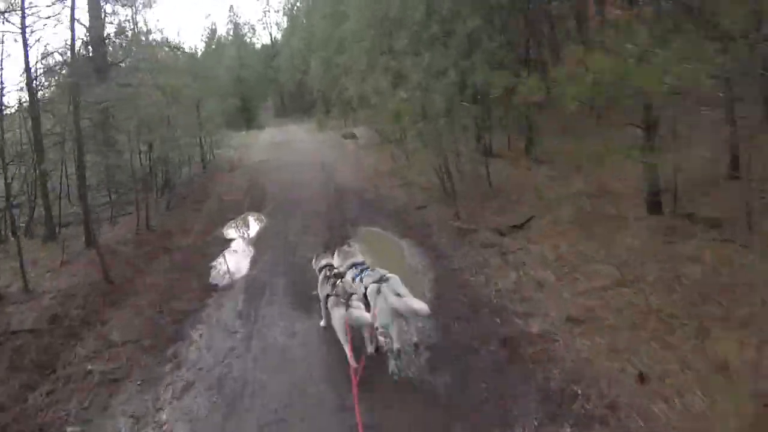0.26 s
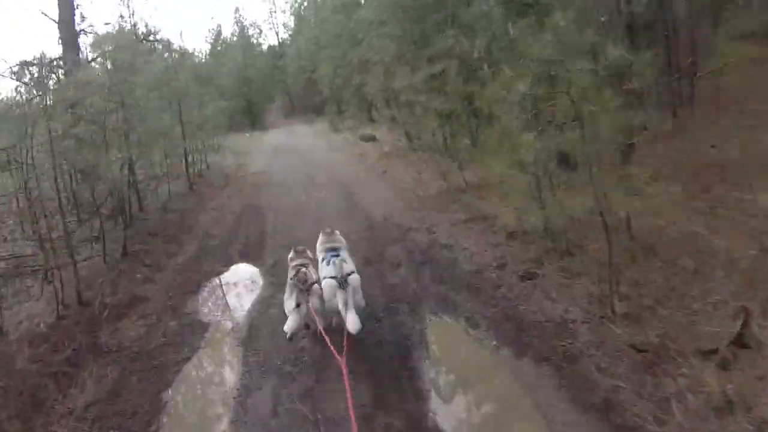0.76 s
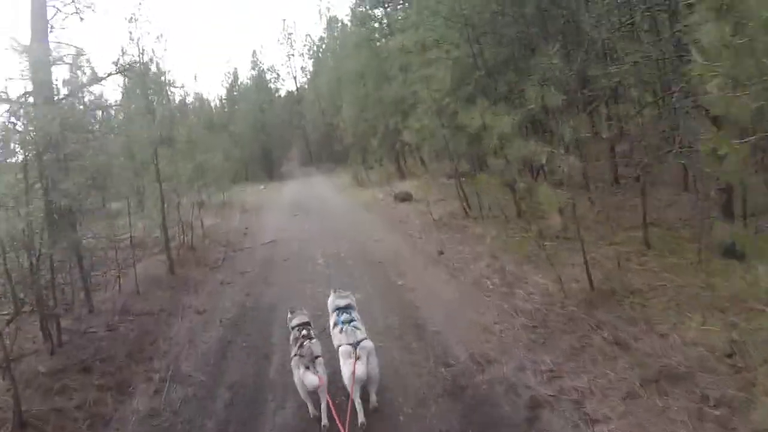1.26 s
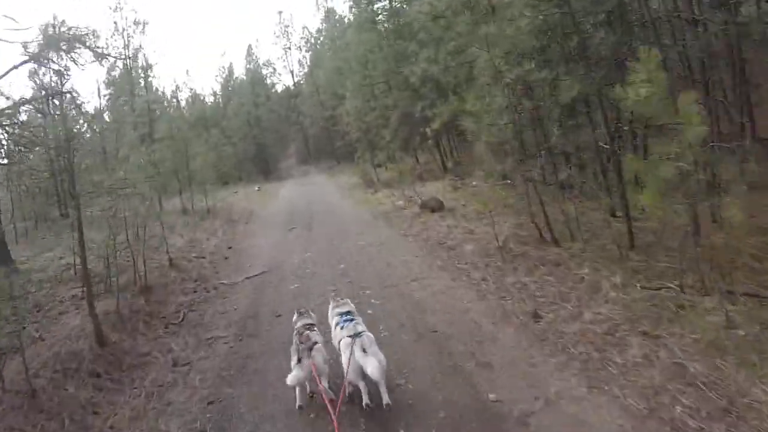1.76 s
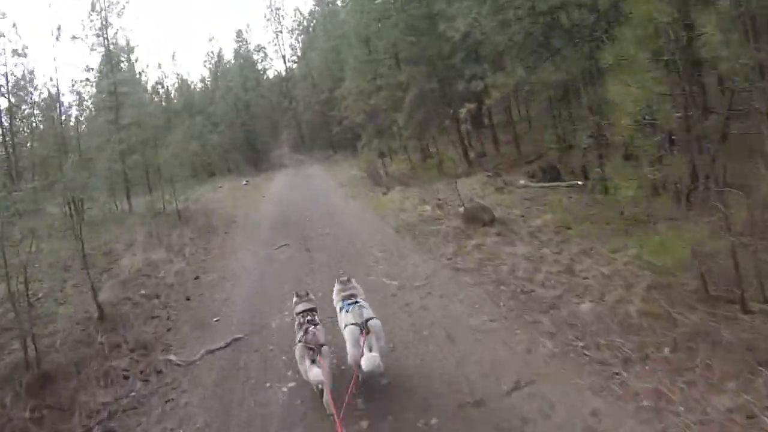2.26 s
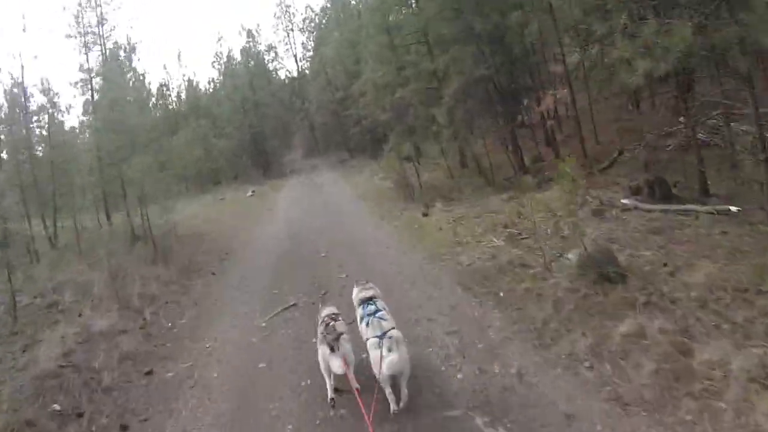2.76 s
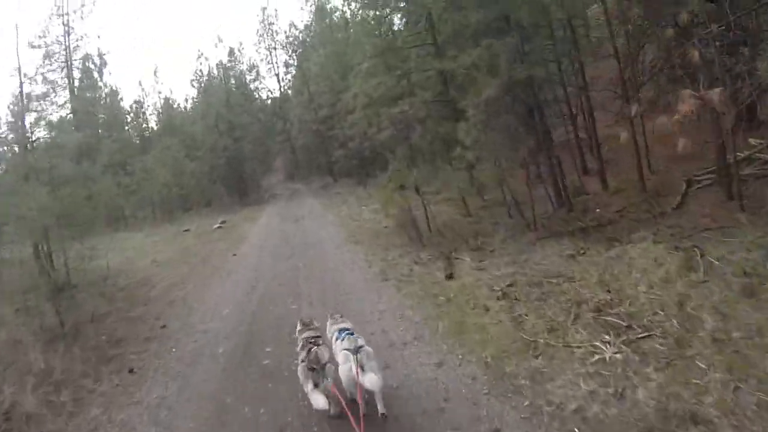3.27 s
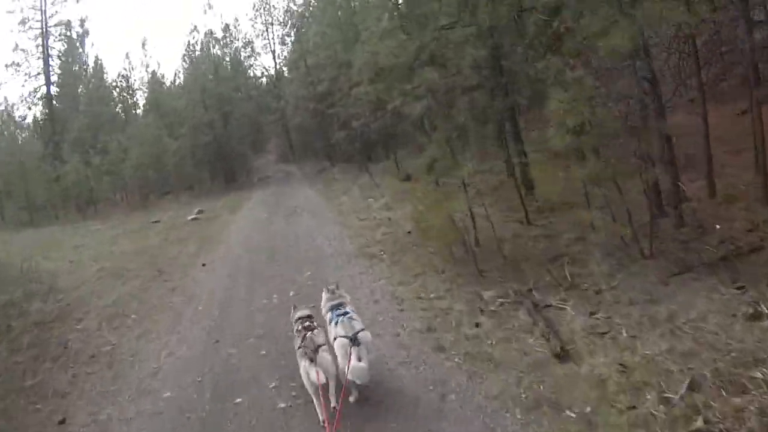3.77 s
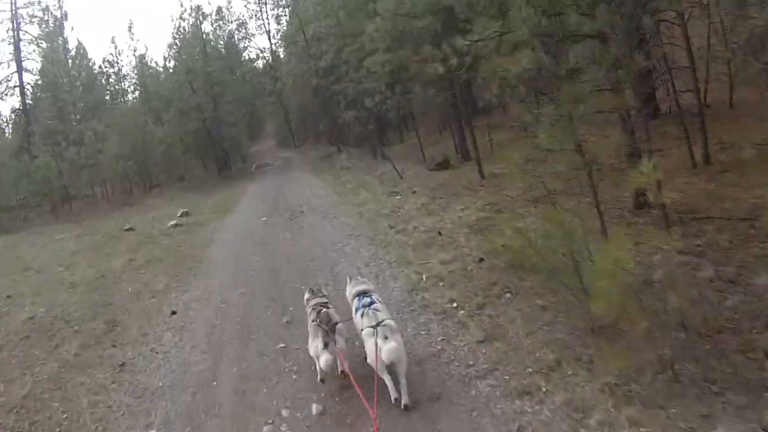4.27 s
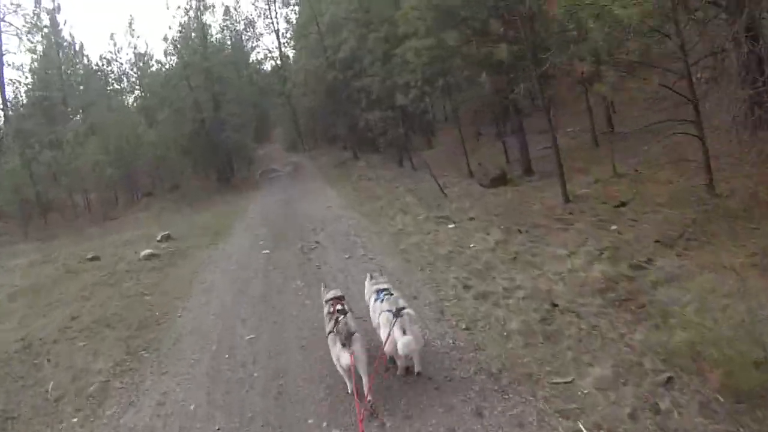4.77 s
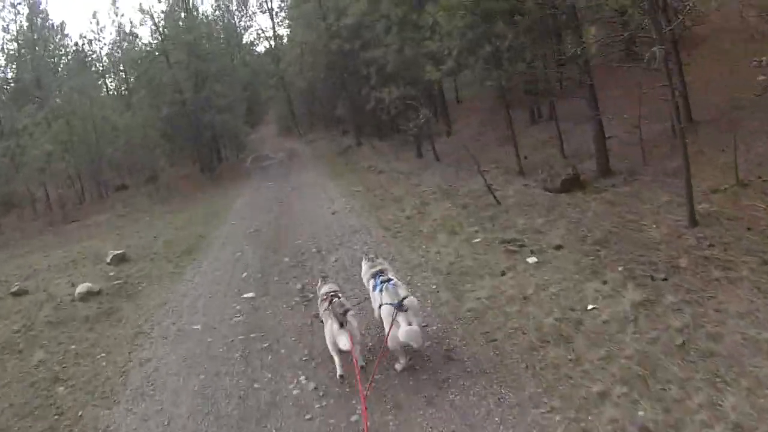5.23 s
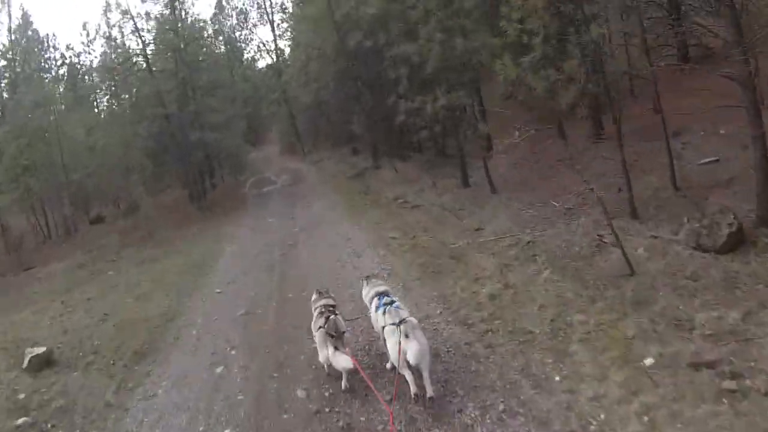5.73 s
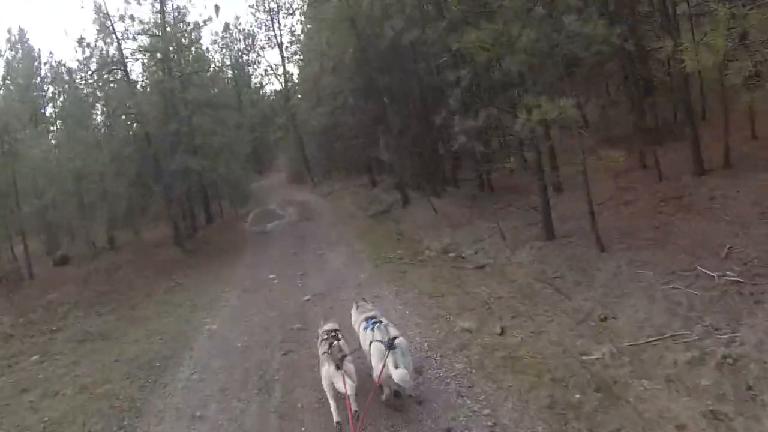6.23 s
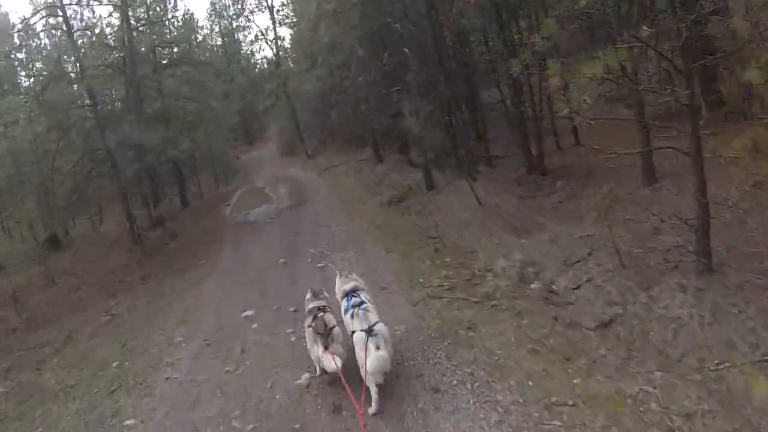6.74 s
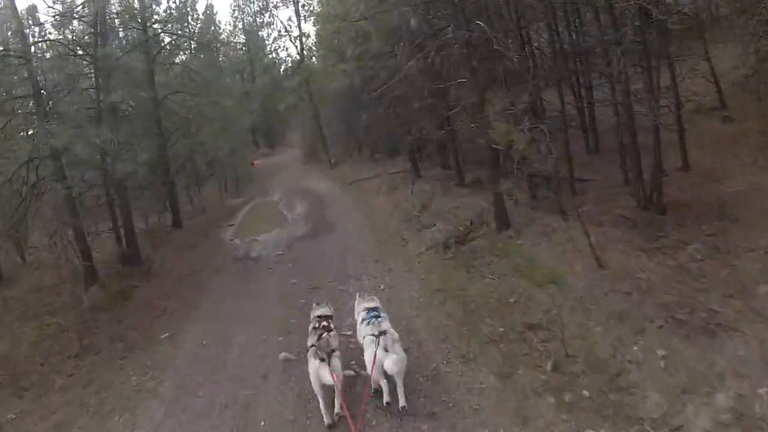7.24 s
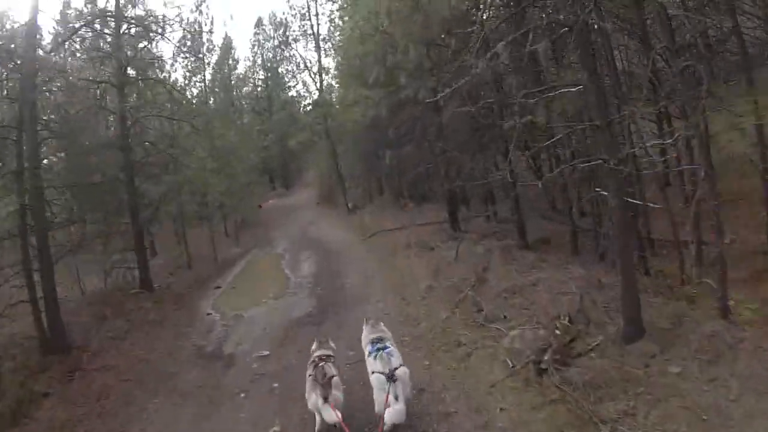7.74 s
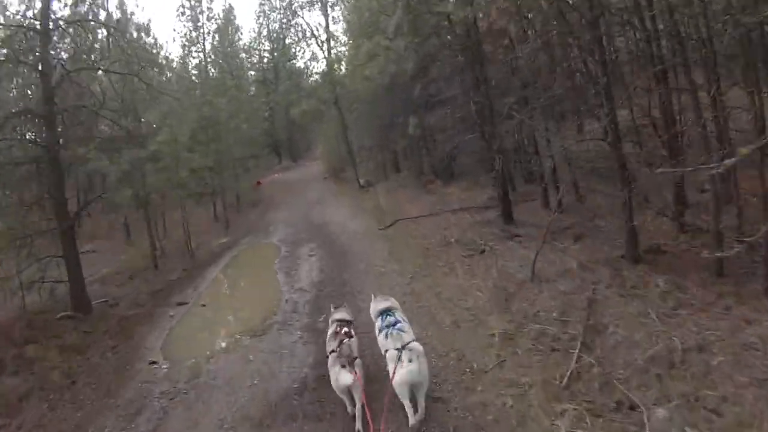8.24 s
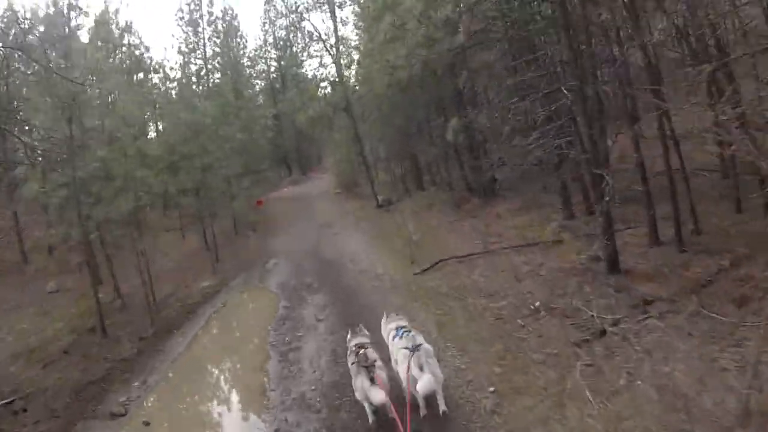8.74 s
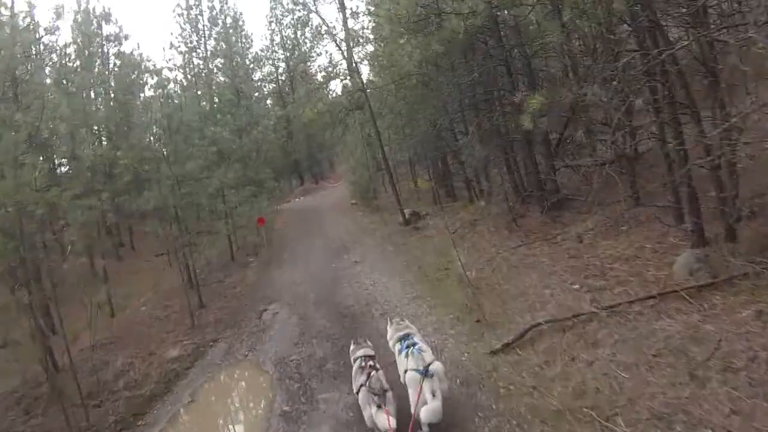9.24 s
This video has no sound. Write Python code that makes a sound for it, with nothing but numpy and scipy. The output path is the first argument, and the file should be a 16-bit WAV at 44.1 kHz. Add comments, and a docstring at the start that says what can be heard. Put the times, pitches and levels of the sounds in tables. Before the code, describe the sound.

A scooter pulled by two dogs rolls steadily through mud and gravel, with low wind roar, gritty crunching, stone snaps and light frame rattles.

```python
"""A muddy gravel trail in a forest: two dogs pull a kick scooter, heard through a closed case on the rider.
Wind on the case is drifting low noise; wet mud and sand are clicks and hiss shaped by filters.
The metal clips of the tow line clink faintly as fading tones, and bumps ring the frame's resonances.
The tyres drone and hum as low noise, crunch grit as crowds of clicks, and flick stones as short snaps."""
import sys
import numpy as np
from scipy import signal
from scipy.fft import rfft, irfft, next_fast_len
from scipy.io import wavfile
from scipy.ndimage import uniform_filter1d, map_coordinates

SR = 44100
rng = np.random.default_rng(int(sys.argv[2]) if len(sys.argv) > 2 else 0)


def file_out(sig):
    """Save sig as 16-bit WAV at sys.argv[1]."""
    # one column per channel
    cols = np.atleast_2d(sig).T
    # limit, then scale
    lim = np.clip(cols, -1, 1)
    pcm = np.round(lim * 32767).astype(np.int16)
    wavfile.write(sys.argv[1], SR, pcm)


N = 418950  # length in samples

# Levels in the tables are relative: the functions add their own gains, and the case colours the sum.
# How much loose gravel the tyres and paws crush: [t/s, level/dB]
GRAVEL_AMOUNT = [(0, -48), (.25, -47.5), (.6, -52.5), (1.55, -54.5), (2.1, -51.5), (2.45, -49.5),
                 (3.15, -50.5), (4, -45), (4.7, -48), (5.6, -48), (6.6, -49), (7.05, -47.5), (7.5, -51.5),
                 (7.95, -51.5), (8.75, -50.5), (9.5, -45.5)]
# Jolts of the frame: [t/s, strength/dB]
JOLTS = [(0.067, -19.5), (0.354, -24), (1.054, -18), (1.085, -24), (2.568, -16.5), (2.656, -20),
         (2.685, -19), (2.708, -29), (2.778, -24), (2.803, -23), (2.822, -17), (3.035, -21), (3.451, -24),
         (3.555, -25), (3.784, -24), (6.03, -21), (6.237, -30), (6.323, -23), (6.63, -24), (6.845, -23),
         (7.895, -27), (7.927, -24), (8.058, -23), (8.125, -26), (8.192, -25), (8.246, -20)]
# Colour of cracking grit: [f/Hz, level/dB]
GRIT_COLOUR = [(300, -43), (900, -3), (1600, 2), (2100, -2.5), (2800, -2), (3800, -10), (5200, -20),
               (7000, -32), (15000, -72)]
# Colour of flying sand and water: [f/Hz, level/dB]
SPRAY_COLOUR = [(800, -12.5), (2500, 0), (3800, 9), (5200, 4.5), (7000, -4.5), (8600, -5.5), (10000, -11.5),
                (12200, -12), (14000, -20), (15500, -40)]
USUAL_GRAVEL_DB, USUAL_RIDE_DB = -54.5, -37  # reference points for the gravel and the tyre drone


def amp(db):
    """Turn decibels into a gain."""
    return 10 ** (np.asarray(db) / 20)


def unit(x):
    """Scale to an average strength (rms) of 1."""
    return x / np.sqrt(np.mean(x ** 2) + 1e-20)


def curves(rows):
    """Draw straight lines between table rows: one curve for each column after the time."""
    s, *cols = np.transpose(rows)
    return [np.interp(np.arange(N) / SR, s, c) for c in cols]


def wobble(rate):
    """A smooth random curve through `rate` random points a second."""
    points = rng.standard_normal(2048)
    return map_coordinates(points, [np.arange(N) * rate / SR], mode="wrap")


def bell(s, half_s):
    """A smooth rise and fall around time s, as one value per sample."""
    return np.exp(-((np.arange(N) / SR - s) / half_s) ** 2)


def filtered(x, response):
    """Multiply the spectrum of x by a complex response to frequency."""
    size = 2 * next_fast_len((N + SR) // 2)
    hz = np.fft.rfftfreq(size, 1 / SR)
    return irfft(rfft(x, size) * response(hz), size)[:N]


def coloured(x, points):
    """Filter through [f/Hz, level/dB] points on a log axis, with no sound ahead of its cause."""
    def response(hz):
        f, db = np.transpose(points)
        gain = amp(np.interp(np.log(hz + 1), np.log(f), db))
        # folding the cepstrum gives the filter minimum phase
        cepstrum = irfft(np.log(gain))
        half = len(cepstrum) // 2
        return np.exp(rfft(np.r_[cepstrum[0], 2 * cepstrum[1:half]], len(cepstrum)))
    return filtered(x, response)


def rush(spectrum, patchy_db):
    """Noise of rms 1 whose colour drifts in random patches of time and frequency."""
    z = signal.stft(rng.standard_normal(N), nperseg=1024)[2]
    patches = uniform_filter1d(rng.standard_normal(z.shape), size=9, axis=0)
    patches = uniform_filter1d(patches, size=7, axis=1)
    noise = signal.istft(z * amp(patchy_db * unit(patches)))[1][:N]
    return unit(coloured(noise, spectrum))


def impacts(per_second, spread_db):
    """Clicks at random moments, with random signs and scattered sizes."""
    hit = rng.random(N) < per_second / SR
    size = amp(spread_db * np.minimum(rng.standard_normal(N), 2))
    return hit * size * rng.choice([-1, 1], N)


def add(track, s, sound):
    """Mix a sound into a track at time s."""
    part = track[max(round(s * SR), 0):][:len(sound)]
    part += sound[:len(part)]


def airflow():
    """Single eddies change the buffeting and the roar for a moment: (buffet dB, roar dB)."""
    # Strength of the air stream on the case: [t/s, roar level/dB]
    air = [(0, -30.5), (.25, -28.5), (.55, -31.5), (1.1, -35), (1.5, -29.5), (2.2, -28.5), (2.8, -28),
           (3.1, -28.5), (3.3, -25), (3.6, -26.5), (3.85, -30), (4.4, -29.5), (4.8, -30), (5.4, -32.5),
           (6.05, -30), (7.35, -35.5), (7.95, -33.5), (8.5, -33.5), (9.5, -37.5)]
    # Large eddies breaking on the case: [t/s, deep buffeting level/dB]
    turbulence = [(0, -32.5), (.35, -34), (1.1, -37.5), (1.6, -31.5), (2.1, -33), (2.8, -30), (3.2, -32),
                  (4.4, -35), (5.1, -32), (5.7, -32.5), (6.5, -34), (7.2, -37.5), (7.8, -32.5), (8.4, -37),
                  (8.85, -35), (9.2, -36.5), (9.5, -34)]
    # Single eddies: [t/s, change of buffeting/dB, change of roar/dB]
    gusts = [(2.94, 7.5, 1.5), (3.56, 3, 1), (4.04, 5, 6), (4.75, -2, 3), (5.63, 2.5, 0)]
    (roar_db,), (buffet_db,) = curves(air), curves(turbulence)
    buffet_db = buffet_db + 1.15 * wobble(12)
    for s, deep_db, lift_db in gusts:
        eddy = bell(s, half_s=0.037)
        buffet_db = buffet_db + deep_db * eddy
        roar_db = roar_db + lift_db * eddy
    return buffet_db, roar_db


def wind(buffet_db, roar_db):
    """Large eddies thump on the case; smaller ones roar as the speed rises."""
    # Colour of the roar: [f/Hz, level/dB]
    roar_colour = [(30, -18.5), (70, -6), (115, 1.5), (180, 2), (300, -2.5), (400, -7.5), (500, -13),
                   (900, -37), (2500, -47), (6000, -100)]
    # Colour of the deep buffeting: [f/Hz, level/dB]
    buffet_colour = [(8, -2.5), (25, -4), (55, -2), (90, -2), (150, -10), (400, -44.5), (2000, -77)]
    buffet = amp(buffet_db + 1.27) * rush(buffet_colour, patchy_db=-0.2)
    roar = amp(roar_db - 0.76 + 0.65 * wobble(16)) * rush(roar_colour, patchy_db=-0.46)
    return buffet + roar


def wet_sand(gravel_db, ride_db):
    """Level of the sand hiss (dB): it grows with the gravel, the tyre drone and the damp."""
    # Wetter ground near the puddles: [t/s, added sand hiss/dB]
    damp = [(0.98, 0), (1.05, 4.5), (1.28, 4.5), (1.4, 2.5), (4.5, -1), (7.6, -2), (8.8, 1.5), (9.5, 6)]
    damp_db, = curves(damp)
    with_gravel = 0.098 * (gravel_db - USUAL_GRAVEL_DB)
    with_ride = 0.69 * (ride_db - USUAL_RIDE_DB)
    return -63.5 + damp_db + with_gravel + with_ride


def spray(level_db):
    """Damp sand flies off the tyres in a faint, sparkling hiss: noise with clicks in it."""
    sparkle = unit(impacts(per_second=500, spread_db=6.5))
    sand = unit(rng.standard_normal(N) + 0.53 * sparkle)
    return amp(level_db + 3.5 + 1.4 * wobble(70)) * unit(coloured(sand, SPRAY_COLOUR))


def puddle(end_s, squelch_db, spray_db):
    """The tyres squeeze through mud and throw water, until they reach firm ground."""
    # Passing between the puddles: [t/s, mud squelch level/dB, water spray level/dB]
    passing = [(0, -54, -55), (.1, -49, -51.5), (.3, -47, -54.5), (.45, -52, -55), (.55, -68, -53.5),
               (.68, -59, -52.5), (.8, -73, -49), (.9, -72, -53), (1, -62, -52)]
    # Colour of squelching mud: [f/Hz, level/dB]
    mud_colour = [(900, -25), (1800, -12), (2500, -6), (3000, -4), (3800, -19), (5200, -18), (9000, -48)]
    mud_db, water_db = curves(passing)
    in_mud = np.clip((end_s - np.arange(N) / SR) / 0.03, 0, 1)
    bubbles = unit(coloured(impacts(per_second=1300, spread_db=6.0), mud_colour))
    water = unit(coloured(rng.standard_normal(N), SPRAY_COLOUR))
    return in_mud * (amp(mud_db + squelch_db) * bubbles + amp(water_db + spray_db) * water)


def ring(modes, t, blur):
    """Fading tones, a little different at every contact and blurred by chatter."""
    out = np.zeros(len(t))
    for hz, db, t60 in modes:  # t60: seconds to fade by 60 dB
        drift = blur * np.cumsum(rng.standard_normal(len(t)))
        phase = 2 * np.pi * (hz * rng.normal(1, 0.0043) * t + rng.random()) + drift
        out += amp(db + rng.normal(0, 1.3)) * 1000 ** (-t / t60) * np.sin(phase)
    return out * (1 - np.exp(-t / 0.0016))  # soft start


def clip_ring(centre_hz, t):
    """The cluster of close, high modes of one steel clip."""
    top_modes = [(-130, -3, 0.24), (0, -0.5, 0.12), (170, 0.5, .08)]
    modes = [(centre_hz + above_hz, db, t60) for above_hz, db, t60 in top_modes]
    return ring(modes, t, blur=0.066)


def clinks(top_db, lower_db, lower_t60):
    """Small steel clips swing against their rings; the notes depend on where they touch."""
    # Touches of the clips: [t/s, top ring f/Hz, top ring level/dB, lower ring f/Hz, lower ring level/dB]
    touches = [(0.078, 11900, -63, 8900, -61), (0.177, 11700, -62, 8800, -68),
               (0.427, 11700, -56, 7400, -67), (1.055, 11900, -71, 8870, -65),
               (1.765, 12300, -67, 8800, -72), (1.88, 11900, -72, 5800, -53),
               (2.222, 11780, -45, 7300, -58), (2.298, 11900, -65, 8800, -72),
               (2.53, 11900, -69, 8750, -66), (2.61, 11900, -72, 8750, -65), (2.789, 11900, -69, 8700, -60),
               (2.893, 11900, -70, 8900, -62), (2.913, 11950, -59, 8790, -63),
               (2.934, 11650, -60, 8900, -60), (3.537, 11700, -68, 8700, -59),
               (3.578, 11900, -74, 8800, -66), (3.635, 11900, -55, 8650, -66),
               (3.665, 11700, -55, 8530, -66), (3.949, 11700, -67, 8700, -74),
               (3.992, 11900, -66, 8350, -75), (4.349, 11950, -60.5, 8350, -71),
               (5.2, 11800, -70, 8700, -66), (5.38, 11900, -60, 8440, -62), (6.047, 11900, -74, 8800, -61),
               (6.255, 11950, -61, 6200, -57), (6.29, 11700, -64, 7410, -61),
               (6.378, 12000, -65, 8800, -72), (6.41, 11900, -75, 8800, -70), (6.49, 11900, -76, 9000, -66),
               (6.695, 11900, -76, 9000, -65), (6.729, 11900, -67, 6300, -66),
               (7.069, 11900, -65, 8300, -66), (7.42, 11900, -70, 8800, -67),
               (8.115, 12050, -63, 8500, -63), (8.481, 11700, -62, 6030, -52.5),
               (8.821, 11850, -58, 8440, -61), (9.183, 12350, -65, 5940, -62)]
    free_ring_db, damping_per_db = -57, 2.2  # a top ring below this level fades faster, per s for each dB
    out, t = np.zeros(N), np.arange(SR // 4) / SR
    for s, hz, db, low_hz, low_db in touches:
        damping = np.exp(-t * damping_per_db * max(free_ring_db - db, 0))
        add(out, s, amp(db + top_db) * damping * clip_ring(hz, t))
        add(out, s, amp(low_db + lower_db) * ring([(low_hz, 0, lower_t60)], t, blur=0.15))
    return out


def ticks(t60, gain_db):
    """Each hard strike of a clip on metal starts with a very short, bright burst of noise."""
    # Strikes: [t/s, strength/dB]
    strikes = [(2.2209, -56), (2.8489, -60), (3.6345, -62), (5.1387, -69), (6.4668, -60), (8.359, -59),
               (8.821, -60)]
    out, t = np.zeros(N), np.arange(SR // 40) / SR
    for s, db in strikes:
        add(out, s, amp(db + gain_db) * 1000 ** (-t / t60) * rng.standard_normal(len(t)))
    return coloured(out, [(2000, -25), (5000, 13), (9000, 9.0), (15000, -9)])


def chatter(ride_db, hz, t60):
    """Vibration keeps a loose steel part tinkling, more on rough ground and after each jolt."""
    # Spells of extra tinkling: [t of the middle/s, half length/s, level/dB]
    spells = [(3.57, .04, -75), (6.23, .05, -76), (6.5, .1, -75)]
    t = np.arange(SR // 8) / SR
    note = ring([(hz, 0, t60)], t, blur=0.2)
    tinkle = signal.fftconvolve(impacts(per_second=40, spread_db=-1.5), note)[:N]
    shaking = amp(-87 + 1.6 * (ride_db - USUAL_RIDE_DB))
    settle = 1000 ** (-np.arange(SR) / SR / 0.76)  # fades by 60 dB in 0.76 s
    for s, db in JOLTS:
        add(shaking, s, amp(db - 66) * settle)
    for s, half_s, db in spells:
        shaking = shaking + amp(db) * bell(s, half_s)
    return shaking * unit(tinkle)


def jingle(t60):
    """The running dogs make the small links of the line touch, each with its own short note."""
    per_second, level_db, scatter_db = 6, -73, 2
    pitch_hz, scatter_octaves = 11900, 0.022
    out, t = np.zeros(N), np.arange(SR // 16) / SR
    draws = rng.random((80, 3))
    times = np.cumsum(-np.log(1 - draws[:, 0])) / per_second  # random gaps
    scatter = np.sqrt(12) * (draws[:, 1:] - .5)  # even spread, standard deviation 1
    for s, (size, pitch) in zip(times, scatter):
        hz = pitch_hz * 2 ** (scatter_octaves * pitch)
        add(out, s, ring([(hz, level_db + scatter_db * size, t60)], t, blur=0.1))
    return out


def frame_ring(x):
    """The frame and deck answer a push with their resonances."""
    # Resonances: [f/Hz, width/Hz, level/dB]
    resonances = [(380, 68, -16), (653, 446, 7.5), (943, 484, 4), (1097, 47, -0.5)]

    def response(f):
        total = 0
        for k, (centre, width, db) in enumerate(resonances):
            band = 1j * f * width
            # neighbouring resonances push in opposite directions
            total = total + (-1) ** k * amp(db) * band / (centre * centre - f * f + band)
        return total
    return filtered(x, response)


def bumps(rise_s, t60, gain_db, push_db):
    """A jolt, softened by the tyre, knocks the frame and rattles it for a moment."""
    out, t = np.zeros(N), np.arange(SR // 4) / SR
    shape = (1 - np.exp(-t / rise_s)) * 1000 ** (-t / t60)
    for s, db in JOLTS:
        add(out, s, amp(db + gain_db) * shape * rng.standard_normal(len(t)))  # rattle
        add(out, s + 0.001, amp([db + push_db]))  # one sharp push
    return frame_ring(coloured(out, [(500, 1.0), (1200, 2.5), (3000, -4.0), (10000, -33)]))


def drone(level_db):
    """The tyres roll on packed earth and shake the frame: a low, unsteady noise."""
    # Colour of the drone: [f/Hz, level/dB]
    drone_colour = [(80, -9), (250, 3.5), (380, 7), (460, 2), (550, 0), (630, 2.5), (720, 0), (830, -1),
                    (1020, -4.5), (1250, -13), (2000, -23), (5000, -64.5)]
    return amp(level_db + 2.5 + 0.64 * wobble(40)) * rush(drone_colour, patchy_db=1.02)


def hum():
    """The tread blocks patter on packed earth and merge into a hollow hum, made of narrow noise."""
    # Firm, packed stretches: [t/s, level/dB]
    firm = [(4.8, -60), (5.45, -38.5), (6.0, -44.5), (6.6, -37.5), (7.0, -36.5), (7.4, -50), (8.3, -43.5),
            (8.9, -60)]
    # Colour of the tread's hum: [f/Hz, level/dB]
    tread_colour = [(150, -30), (240, 1), (300, -2.5), (370, 1.5), (420, -9.5), (520, -27.5), (2000, -100)]
    level_db, = curves(firm)
    return amp(level_db) * rush(tread_colour, patchy_db=2.5)


def grind():
    """Coarse stones knock against each other under the tyres, lower in pitch than the grit."""
    # Patch of coarse stones: [t/s, level/dB]
    coarse = [(7.5, -80), (7.76, -50.5), (7.92, -48), (8.0, -49), (8.12, -47), (8.2, -52), (8.255, -43),
              (8.32, -51.5), (8.55, -51.5), (8.8, -80)]
    # Colour of the grinding: [f/Hz, level/dB]
    grind_colour = [(400, -27), (900, -6), (1400, -3), (2000, -0.5), (2500, -8), (3300, -26), (6000, -57)]
    level_db, = curves(coarse)
    return amp(level_db) * unit(coloured(impacts(per_second=450, spread_db=2), grind_colour))


def crushing(gravel_db):
    """The crunch follows the patchy gravel and flares where a paw or tyre kicks up grit (dB)."""
    # Short spatters of grit: [t/s, lift of the crunch/dB]
    scuffs = [(1.255, 8), (1.285, 9), (1.71, 8.5), (2.812, 8.5), (3.785, 6.5), (6.35, 5.5), (6.97, 5),
              (7.07, 4), (7.185, 4), (7.38, 3.5)]
    level_db = gravel_db + 0.5 * wobble(13)
    for s, lift_db in scuffs:
        level_db = level_db + lift_db * bell(s, half_s=0.012)
    return level_db


def crunch(level_db, grain_db, bed_db):
    """Grains crack under the tread in short clumps, over a bed of finer grit."""
    clumps = amp(2.9 * wobble(90) + 2.36 * wobble(35))
    cracks = coloured(impacts(per_second=600, spread_db=-0.5), GRIT_COLOUR)
    grains = amp(grain_db) * unit(clumps * cracks)
    bed = amp(bed_db) * rush(GRIT_COLOUR, patchy_db=2.0)
    return amp(level_db) * (grains + bed)


def pebbles():
    """Small stones at random moments, stronger in deep gravel: rows like those of the larger stones."""
    per_second, over_gravel_db, scatter_db = 30, 15, 1
    pitch_hz, scatter_octaves, fall_cycles = 1940, 0.53, 0.43
    draws = rng.random((600, 3))
    s = np.cumsum(-np.log(1 - draws[:, 0])) / per_second  # random gaps
    size, pitch = np.sqrt(12) * (draws[:, 1:].T - .5)  # even spread, standard deviation 1
    depth_db = np.interp(s, *np.transpose(GRAVEL_AMOUNT)) - USUAL_GRAVEL_DB
    db = USUAL_GRAVEL_DB + over_gravel_db + 0.49 * depth_db + scatter_db * size
    hz = pitch_hz * 2 ** (scatter_octaves * pitch)
    rows = np.c_[s, db, hz, np.full(len(s), fall_cycles)]
    return list(rows[s < N / SR])


def stones(rise_cycles, gain_db):
    """A pinched stone shoots out with a dry snap of a cycle or two; a few ring on a little longer."""
    # Larger stones flicked by the tyres: [t/s, strength/dB, pitch f/Hz, fading time/cycles]
    large_stones = [(0.107, -22, 1790, .5), (0.165, -19.5, 2420, 0.44), (0.377, -26, 2500, 0.46),
                    (0.456, -25, 2400, .6), (0.83, -24, 1860, 0.27), (0.9975, -27.5, 2930, .3),
                    (1.1288, -24, 1930, 0.17), (1.2495, -31, 2600, .5), (1.338, -36, 2600, .8),
                    (1.4088, -29, 2280, 0.49), (1.4588, -28.5, 1900, 0.33), (1.482, -35, 2200, .5),
                    (1.8491, -24, 2330, 1.2), (1.8494, -31, 3850, 2.4), (1.858, -37, 3750, 3.6),
                    (1.9299, -26, 2900, .3), (2.4503, -23.5, 2300, .5), (2.4542, -17.5, 1700, .25),
                    (2.6918, -17, 1680, 1.7), (2.6922, -28.5, 2630, 2.6), (2.7658, -24, 2500, 0.92),
                    (2.906, -32, 2600, .6), (3.7507, -25, 2230, 0.27), (3.783, -32, 1570, .3),
                    (3.8615, -23.5, 2100, .5), (3.9715, -20, 1640, 0.27), (3.9925, -23.5, 1770, .4),
                    (4.0624, -23, 1970, .4), (4.1132, -22.5, 2150, 0.35), (4.283, -26, 1800, .5),
                    (4.411, -24, 2100, .4), (4.4173, -16.5, 2160, 0.41), (4.4654, -22.5, 1820, .4),
                    (4.522, -28, 2300, 0.43), (4.547, -29, 1900, .4), (4.694, -22.5, 2300, 0.36),
                    (4.7145, -25, 1710, 0.45), (5.566, -29, 2500, 0.7), (5.6014, -14.5, 1840, 0.35),
                    (6.974, -25, 1970, 0.43), (7.0655, -25, 1700, .4), (7.0755, -30, 2100, .4),
                    (7.198, -28, 2200, .4), (7.4825, -27, 2000, .4), (7.5772, -27.5, 2060, 0.55),
                    (7.6653, -28, 2100, 0.43), (7.667, -27, 2340, .75), (7.8128, -24, 1560, 0.61),
                    (7.8265, -25, 2400, .3), (7.8604, -21.5, 1380, 0.43), (7.917, -27, 2400, 0.36),
                    (7.927, -16, 1590, 0.59), (7.9476, -23, 1760, .45), (8.058, -11, 1530, 0.51),
                    (8.2478, -28, 1520, 0.49), (8.26, -18.5, 1310, 0.3), (8.6475, -26, 1900, .4),
                    (9.1236, -21, 2200, .5), (9.1257, -23, 2350, .7), (9.434, -29, 2200, .4)]
    out, t = np.zeros(N), np.arange(-(SR // 300), SR // 100) / SR
    rows = list(large_stones) + pebbles()
    phases = rng.normal(0, 0.59, len(rows))
    for (s, db, hz, fall_cycles), phase in zip(rows, phases):
        cycles = hz * t
        shape = 1 / (np.exp(-cycles / rise_cycles) + np.exp(cycles / fall_cycles))
        snap = shape / shape.max() * np.cos(2 * np.pi * cycles + phase)
        add(out, s + t[0], amp(db + gain_db) * snap)
    return out


def skitter(snaps):
    """A flicked stone drags grit along: each snap leaves a short, ragged tail."""
    settle = 1000 ** (-2 * np.arange(SR // 10) / SR / 0.022)  # power falls by 60 dB in 0.022 s
    power = signal.fftconvolve(snaps ** 2, settle / settle.sum())[:N]
    strength = np.sqrt(np.abs(power))
    grit = unit(coloured(impacts(per_second=1100, spread_db=4), GRIT_COLOUR))
    return amp(-15) * strength * grit


def scene():
    """All sounds of the ride reach the microphone through the case, which colours them."""
    # Roughness of the ground under the tyres: [t/s, tyre drone level/dB]
    roughness = [(0, -39), (.38, -38.5), (.6, -40.5), (1.05, -39), (1.4, -41), (2.4, -39.5), (2.7, -36),
                 (3.15, -38.5), (3.45, -38.5), (4, -36.5), (4.3, -39.5), (6.1, -38), (7.3, -40),
                 (8.15, -36), (8.7, -41), (9.5, -41)]
    # Colour of the closed case: [f/Hz, level/dB]
    case_colour = [(1300, 1), (1700, 2), (2050, 1.5), (2400, 4), (2850, 4.5), (3230, -4), (3600, 0.5),
                   (3950, 2.5), (4250, -2), (4550, -6.5), (5030, 2.5), (5900, 0.5)]
    (ride_db,), (gravel_db,) = curves(roughness), curves(GRAVEL_AMOUNT)
    air = wind(*airflow())
    wet = spray(wet_sand(gravel_db, ride_db))
    wet = wet + puddle(end_s=1.01, squelch_db=-3.0, spray_db=0.5)
    steel = clinks(top_db=-3.0, lower_db=2.5, lower_t60=0.12) + ticks(t60=0.0088, gain_db=8.0)
    steel = steel + chatter(ride_db, hz=8840, t60=0.07) + jingle(t60=0.05)
    frame = bumps(rise_s=0.0015, t60=0.088, gain_db=-0.5, push_db=13)
    rolling = drone(ride_db) + hum()
    snaps = stones(rise_cycles=0.21, gain_db=-0.8)
    knocks = amp(3.0) * frame_ring(snaps)  # each stone also kicks the frame
    gravel = crunch(crushing(gravel_db), grain_db=-2.5, bed_db=-4.5) + grind()
    gravel = gravel + snaps + knocks + skitter(snaps)
    return coloured(air + wet + steel + frame + rolling + gravel, case_colour)[None]


def record(dry):
    """The microphone's band limit removes everything from 15400 Hz up."""
    return filtered(dry[0], lambda hz: hz < 15400)[None]


dry = scene()
out = record(dry)
file_out(out)
```